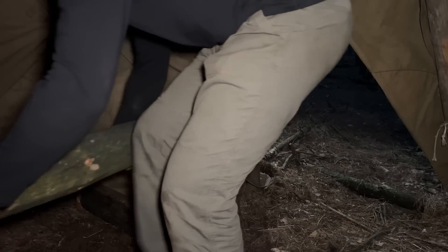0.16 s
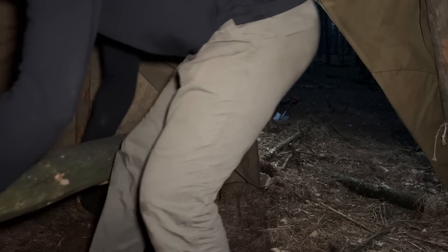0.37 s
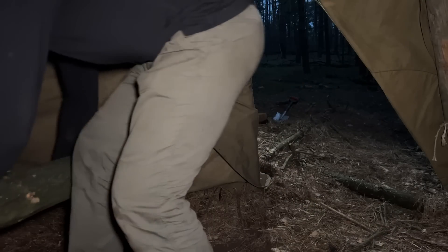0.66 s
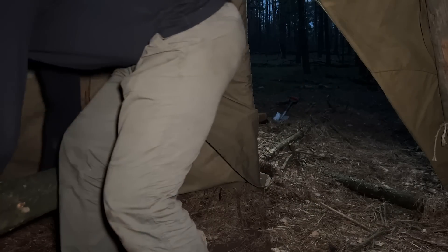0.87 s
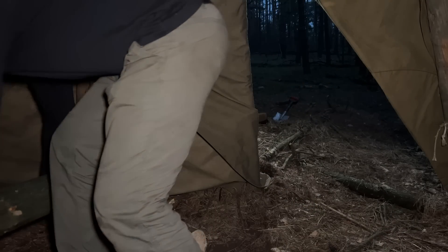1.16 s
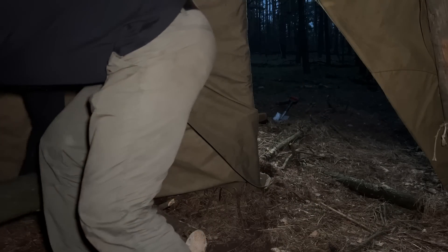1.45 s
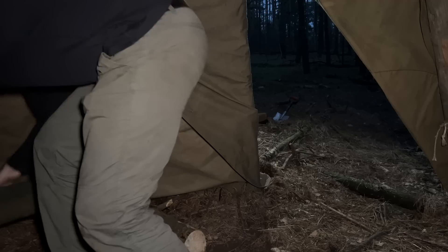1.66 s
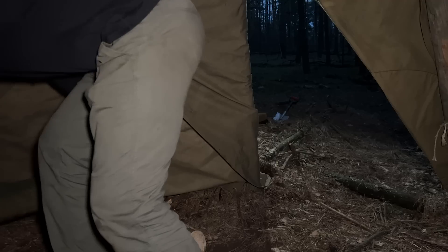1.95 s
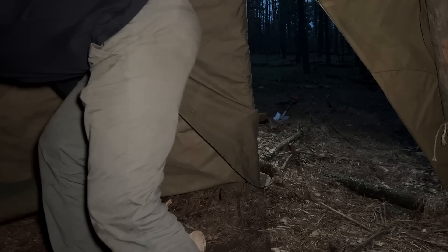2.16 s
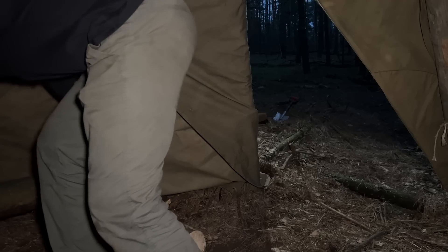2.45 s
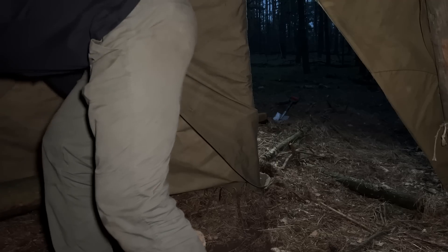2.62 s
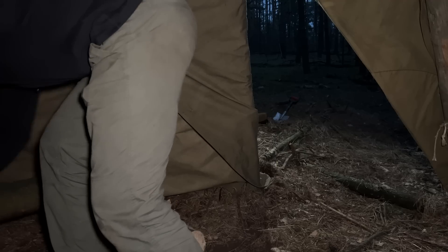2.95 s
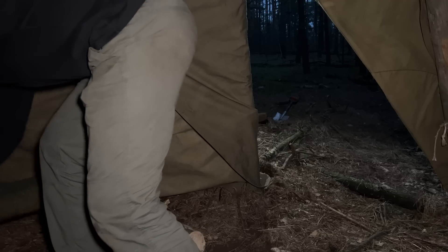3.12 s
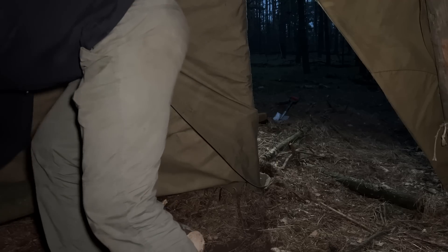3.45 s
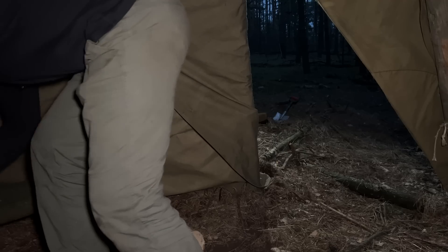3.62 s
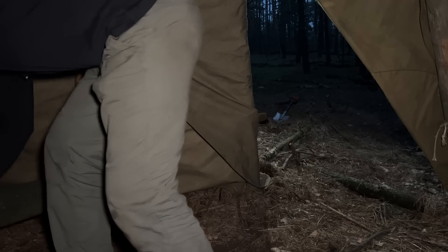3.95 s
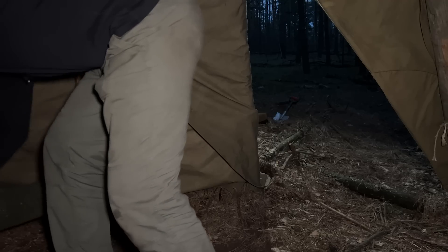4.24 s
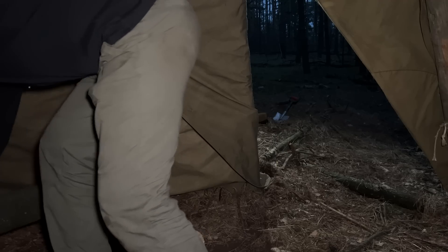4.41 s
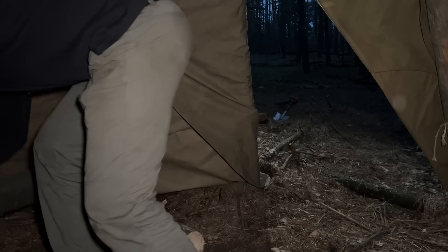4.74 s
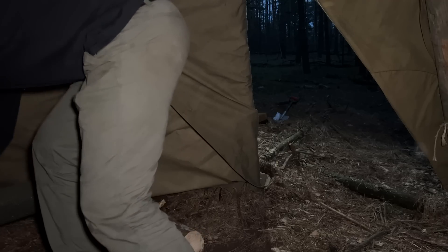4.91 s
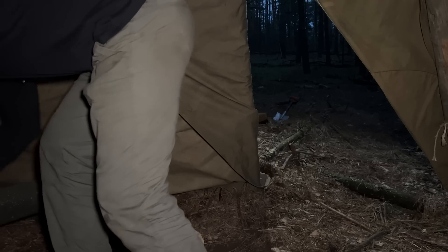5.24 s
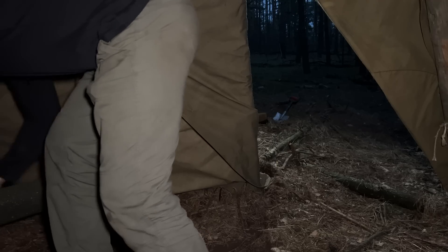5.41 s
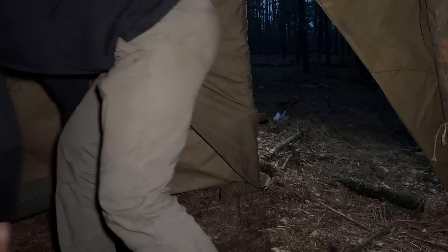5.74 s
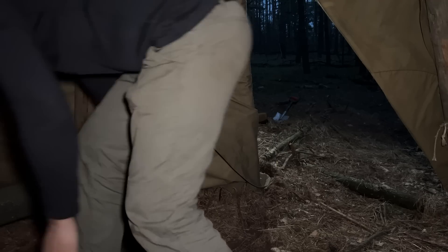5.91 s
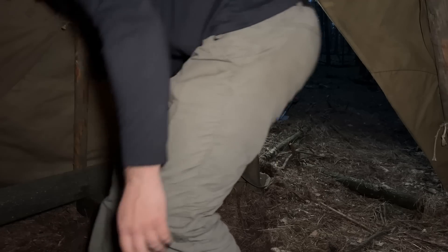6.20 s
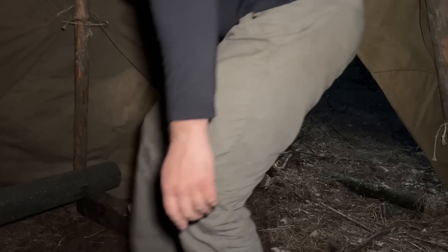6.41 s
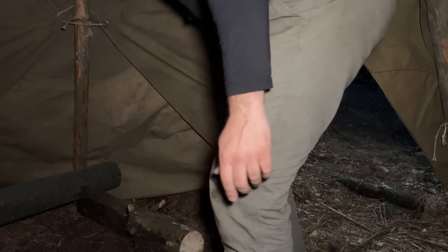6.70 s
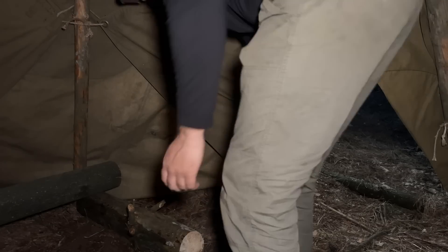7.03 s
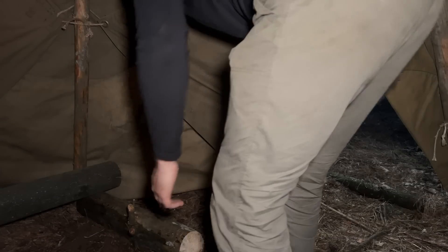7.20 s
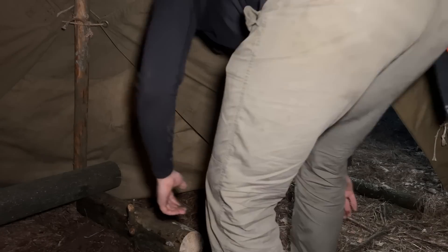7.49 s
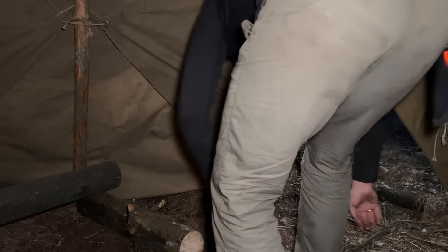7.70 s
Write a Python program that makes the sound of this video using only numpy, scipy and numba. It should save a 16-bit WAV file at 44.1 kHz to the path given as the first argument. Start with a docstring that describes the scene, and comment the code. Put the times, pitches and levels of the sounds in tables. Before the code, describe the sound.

Close, dry log dragging with rasps and twig snaps, three loud hollow thuds spaced apart, then faint scuffs and cloth swishes in forest hush.

```python
"""At first a log is dragged in shoves over dry needles: bark catches and slips, so random grains rasp and sing.
Near 1.7, 3.5 and 4.9 s it drops hard on its neighbours: damped log tones, ground thuds and crushed bark,
with the loudest peaks flattened; fainter knocks fall between. After that only small movements are left.
All along, noise makes scuffs, rustles and swishes, rounded pushes make soft thumps, short bursts snap and tick,
and low noise rumbles under a soft hush, swelling when weight rocks the stand. The tarp shelter gives no echo."""
import sys
import numpy as np
from scipy import signal
from scipy.fft import rfft, irfft, next_fast_len
from scipy.io import wavfile
from scipy.ndimage import uniform_filter1d
from numba import njit

SR = 44100
rng = np.random.default_rng(int(sys.argv[2]) if len(sys.argv) > 2 else 0)


def dump_mix(stems):
    """Bounce the given channels to the path in sys.argv[1] as a 16-bit WAV at rate SR."""
    frames = np.atleast_2d(stems).T  # one column per channel
    limited = np.clip(frames, -1, 1)  # hard clip at full scale
    pcm = np.round(limited * 32767).astype(np.int16)
    wavfile.write(sys.argv[1], SR, pcm)


N = 346609
TIME = np.arange(N) / SR
TOP_HZ = 15800  # upper edge of the sound

# Log on log, each blow and rebound: (time [s], ring gain [dB], log pitch [Hz], contact length [ms],
# time until it lands again [ms], change of the ring on landing [dB], thud gain [dB], bark crack gain [dB])
LOG_KNOCKS = [(1.725, -6.5, 409, .7, 24.8, -6, -9.5, -32.5), (2.2989, -29.5, 400, .8, 13, -6.5, -26, -48),
              (3.3385, -30, 418, .7, 14.6, -3.5, -24.5, -42.5),
              (3.3987, -25.5, 416, 1.3, 11.7, 3, -18.5, -39.5),
              (3.4563, 0.5, 408, 1.3, 15.36, -28, -11.5, -26),
              (3.4740, -16.5, 421.6, .6, 40, -5.5, -32.5, -44.5),
              (3.4720, -24.5, 699, 0.68, 16, -15, -37, -46.5), (4.8254, -29, 519, .7, 13, -6.5, -23, -37.5),
              (4.8338, -21.5, 427, .5, 18, -5.5, -28.5, -36),
              (4.9449, 5.5, 405, 1.6, 15.3, -31, -11, -22.5),
              (4.962, -26.5, 701, 0.79, 24, -21.5, -34.5, -51),
              (4.9673, -12, 426, 1.3, 14.2, -10, -23.5, -53)]
# Tones of a log: (multiple of its pitch [ratio], relative level [dB], time to fade by 60 dB [s])
LOG_MODES = [(1.01, 5, 0.21), (.98, -2.5, 0.11), (.7, -0.5, 0.021), (1.25, -20.5, .07), (1.47, -13.5, .09),
             (1.68, -7.5, 0.13), (1.78, -2, 0.019), (2.2, -21.5, 0.037), (2.64, -18.5, .05),
             (2.95, -24, .08)]
# Tones of the ground under the pile: (frequency before the thud's pitch factor [Hz], relative level [dB],
# time to fade by 60 dB [s])
GROUND_MODES = [(90, -17, 0.22), (147, -6.5, 0.053), (196, -1.5, 0.11), (290, 16.5, 0.0077)]
# Shoves of the log over the litter: (start [s], length [s], hollow drag before trim [dB],
# bark scrape before trim [dB], needle rustle before trim [dB], singing pitch around mid-shove [Hz])
LOG_SHOVES = [(0.038, 0.07, -43, -47, -54.5, 960), (0.114, 0.059, -46, -43.5, -53, 1200),
              (0.201, 0.044, -51.5, -50, -55, 1250), (0.333, 0.069, -49, -58, -59, 540),
              (0.453, 0.17, -44, -47.5, -52, 1000), (0.644, 0.038, -38.5, -37.5, -46.5, 1020),
              (0.669, 0.041, -37, -39, -46, 980), (0.736, 0.044, -37.5, -42.5, -51.5, 660),
              (.81, 0.085, -43, -44, -54, 800), (0.922, 0.12, -42, -45, -54.5, 1080),
              (1.195, 0.039, -44, -44, -50, 900), (1.325, 0.047, -45, -47, -64, 1100),
              (1.557, .025, -44.5, -51, -58, 700), (1.666, 0.091, -43, -43.5, -51, 900),
              (1.789, .08, -45.5, -51, -54.5, 900), (2.257, 0.016, -44, -48.5, -53, 620),
              (2.289, 0.066, -38.5, -46, -48, 1150), (3.27, .15, -48, -53, -56, 620),
              (4.721, 0.077, -47.5, -54, -58, 800), (4.781, 0.079, -38.5, -48, -55.5, 760),
              (4.89, 0.022, -45, -54, -51.5, 1200)]
# Shuffles of feet and body: (start [s], length [s], dull ground scuff before trim [dB],
# litter rasp before trim [dB], rustle of cloth and needles before trim [dB])
BODY_SHUFFLES = [(1.075, 0.86, -53.5, -58, -61.5), (1.971, 0.17, -55, -63.5, -63),
                 (2.389, 0.054, -52.5, -59.5, -64.5), (2.754, 0.28, -60.5, -64.5, -68.5),
                 (3.032, 0.073, -53.5, -55, -53.5), (3.133, 0.066, -59, -63.5, -61),
                 (3.53, 0.28, -56, -65.5, -70.5), (3.97, 0.57, -57.5, -62.5, -65.5),
                 (4.428, 0.076, -50, -57, -60.5), (4.54, 0.098, -56.5, -68, -73),
                 (4.999, 0.15, -59.5, -63.5, -71), (5.97, 0.31, -68, -72, -72.5),
                 (6.757, 0.26, -63.5, -67.5, -68.5), (7.341, .05, -67.5, -63.5, -73),
                 (7.442, 0.064, -63.5, -59.5, -65.5), (7.57, 0.074, -69, -68, -68.5),
                 (7.764, 0.1, -55.5, -58.5, -60)]
# Soft bumps of feet and wood on the ground: (peak time [s], peak before the high-pass [dB], half length [ms])
GROUND_THUMPS = [(0.583, -21.5, 11.7), (1.365, -23, 6.2), (1.568, -17.5, 11.5), (2.313, -24.5, 1.6),
                 (2.8944, -24, 0.87), (2.901, -32, 2.7), (2.962, -21, 4.5), (2.992, -20.5, 13),
                 (3.175, -32, 1.15), (3.411, -17, 1.6), (3.736, -32, 0.51), (4.688, -35.5, 1.05),
                 (4.844, -26, 0.52), (4.848, -25, 0.41), (4.858, -17.5, 1.1), (5.7547, -28, 1.1),
                 (5.979, -39, 0.65), (6.073, -25, 4.8), (6.482, -27.5, 7.3), (6.629, -32.5, 1.2),
                 (6.724, -32.5, 0.54), (7.578, -46, 0.64)]
# Twigs and bark snapping: (time [s], strength [dB], pitch [Hz], decay [ms])
TWIG_SNAPS = [(.06, -36.5, 880, 4), (0.459, -54, 1160, 2.2), (.532, -36, 990, 5.1),
              (0.625, -38.5, 2340, 20), (0.8213, -42, 5830, 6.4), (1.016, -44.5, 3020, 23),
              (1.289, -40, 910, 5.5), (1.559, -45, 4000, 5), (1.728, -36.5, 3200, 6),
              (1.754, -34, 6340, 2.7), (2.3, -33.5, 980, 8.1), (2.721, -48, 2680, 2.6),
              (2.7572, -52, 2420, 11), (3.393, -34, 5640, 1.4), (3.4572, -18.5, 5200, 0.74),
              (3.46, -33.5, 1980, 8.9), (3.7321, -41, 820, 9.1), (3.734, -41, 3680, 5.3),
              (4.2498, -52.5, 7140, 3.9), (4.687, -47.5, 720, 12), (4.823, -34, 1835, 6),
              (6.7205, -47.5, 800, 10), (7.25, -55.5, 905, 10), (7.2515, -61.5, 5000, 8),
              (7.336, -58, 1410, 2.8), (7.4353, -54.5, 2000, 2.5)]
# Sleeves and trouser legs brushing past: (peak time [s], peak level [dB], half length [s])
CLOTH_SWISHES = [(1.21, -54.5, 0.023), (3.028, -58, 0.07), (7.247, -77, 0.011), (7.476, -60.5, 0.064),
                 (7.628, -63, 0.067)]
# Weight coming down beside the stand and rocking it: (start [s], length [s], rumble before trim [dB])
STAND_ROCKS = [(1.733, 0.3, -37.5), (2.29, 0.12, -31.5), (2.94, 0.07, -33.5), (3.334, 0.18, -30),
               (4.797, 0.21, -29.5)]

# Colours of the noises, from dull to bright within each: (frequency [Hz], relative level [dB])
# the log's hollow body and the dull ground
DRAG_COLOUR = [(40, -13.5), (75, 2.5), (140, -3.5), (230, -5), (400, -5.5), (540, -4), (700, -8.5),
               (900, -20.5), (1400, -46)]
# bark and litter rasping
SCRAPE_COLOUR = [(500, -23), (780, -1.5), (1030, -3), (1300, -1.5), (1650, -6.5), (2100, -7), (2700, -18.5),
                 (4500, -33.5)]
# trouser cloth and needles
RUSTLE_COLOUR = [(1200, -26), (2400, 0.5), (3200, -1.5), (5000, -5), (7000, -6), (9500, -12),
                 (12500, -12.5), (15000, -19.5), (16000, -35)]
# crushed bark
CRACK_COLOUR = [(300, -4.5), (900, 6.5), (1600, -5), (2100, -4), (3000, -7.5), (6000, -18.5), (12000, -23),
                (16000, -43)]
# fabric on fabric
SLEEVE_COLOUR = [(1500, -24), (3500, -24), (5000, -3), (7000, 1), (9500, -4), (12500, -5), (16000, -14)]
# the shaking stand
STAND_COLOUR = [(5, -0.5), (11, 0), (18, -2), (26, -1), (36, -1.5), (55, -12), (90, -18.5), (140, -25.5),
                (250, -52.5)]
# the hush of the forest
AIR_COLOUR = [(20, 9.5), (40, 16.5), (80, 13), (130, 4), (250, -0.5), (500, -6), (1000, -10.5),
              (2000, -15.5), (4000, -20.5), (8000, -21.5), (14000, -26), (16000, -39)]

# Every movement builds up, holds and dies away; the bark sings higher as a shove goes on
ATTACK_S, RELEASE_S, RISE_OCT_PER_S = 0.029, .031, .6
# The litter is never quite at rest (level before trim)
REST_DB = -78
# Build-up and fading of a rock of the stand, and its shake in between (level before trim)
ROCK_ATTACK_S, ROCK_RELEASE_S, STILL_DB = 0.05, 0.068, -44.5


def knocks(land_ms=1.95, rebound_db=-8.0, crack_ms=7, crumble_db=-24, crumble_ms=40):
    """A log strikes the pile and rings until it lands again, which changes the ring and thuds once more."""
    out = np.zeros(N)
    t = np.arange(SR // 2) / SR
    ms = t * 1000
    for s, ring_db, pitch_hz, contact_ms, free_ms, choke_db, thud_db, crack_db in LOG_KNOCKS:
        # a longer contact is a softer push, with fewer high tones
        push = np.sin(np.pi * np.minimum(ms[:SR // 100] / contact_ms, 1))
        push /= push.sum()
        landed = (1 + np.tanh((ms - free_ms) / land_ms)) / 2  # goes from 0 to 1
        wood = ring(LOG_MODES, pitch_hz, t) * (1 - landed + landed * undb(choke_db))
        thud = undb(thud_db) * ring(GROUND_MODES, 0.89, t)
        add(out, s, np.convolve(undb(ring_db) * wood + thud, push))
        add(out, s + free_ms / 1000, undb(rebound_db) * np.convolve(thud, push))
        # bark is crushed at the contact and crumbles a little after it
        crush = np.exp(-ms / crack_ms) + undb(crumble_db) * np.exp(-ms / crumble_ms)
        bark = colour(rng.standard_normal(len(t)), CRACK_COLOUR)
        add(out, s, undb(crack_db) * crush * bark)
    return out


def ring(modes, pitch_hz, t):
    """Fading tones set off by one blow; neighbours swing oppositely, so the ring takes a moment to build."""
    total = np.zeros(len(t))
    for k, (ratio, db, t60) in enumerate(modes):
        fade = np.exp(-np.log(1000) * t / t60)
        total += (-1) ** k * undb(db) * np.sin(2 * np.pi * ratio * pitch_hz * t) * fade
    return total


def dragging(drag, scrape, contact_hz, drag_db=-2, scrape_db=-2, squeal_db=-2, squeal_q=13,
             grip=0.36, grip_db=-43, judder_db=0.33, wood_share=.6, wood_q=18):
    """Bark catches and slips over the litter; the slips sound the log's hollow and the contact sings."""
    catches = undb(1.8 * walk(24))
    judder = catches * undb(judder_db * walk(70))
    slips = grains(4000, 1.7) * judder
    wood = sum(resonate(slips, hz, wood_q) for hz in (400, 540, 690))
    hollow = colour(slips + wood_share * wood, DRAG_COLOUR) * drag * undb(drag_db)
    crumbs = grains(3000, 3.2)
    rasp = undb(scrape_db) * colour(crumbs * judder, SCRAPE_COLOUR)
    wandering_hz = contact_hz * np.exp(0.046 * walk(30))
    squeal = unit(glide(grains(6000, 2.5), wandering_hz, float(squeal_q)))
    # below grip_db a lightly brushed contact sings less and mostly rasps
    missing_grip_db = np.minimum(20 * np.log10(scrape) - grip_db, 0)
    sing = undb(squeal_db + grip * missing_grip_db)
    return hollow + (rasp + sing * squeal * judder) * scrape


def contact():
    """Pitch at which the bark sings: each shove has its own and hands over to the next."""
    pitch, weight = np.zeros(N), np.zeros(N)
    for s, length, *_, hz in LOG_SHOVES:
        speed = swell(s, length, ATTACK_S, RELEASE_S)
        from_middle = np.clip(TIME - s, 0, length) - length / 2
        pitch += speed * hz * np.exp2(RISE_OCT_PER_S * from_middle)
        weight += speed
    return pitch / weight


@njit
def glide(x, hz, q):
    """A resonance whose centre moves from sample to sample."""
    y, band, low = np.empty(len(x)), 0., 0.
    for i in range(len(x)):
        g = np.tan(np.pi * hz[i] / SR)
        v = (band + g * (x[i] - low)) / (1 + g * (g + 1 / q))
        band, low, y[i] = 2 * v - band, low + 2 * g * v, v / q
    return y


def handling():
    """Gains of the hollow drag, the scrape and the rustle, each set by its strongest movement."""
    gains = np.full((3, N), undb(REST_DB))
    movements = [shove[:5] for shove in LOG_SHOVES] + BODY_SHUFFLES
    for s, length, *db in movements:
        gains = np.maximum(gains, np.outer(undb(db), swell(s, length, ATTACK_S, RELEASE_S)))
    return gains


def swell(start, length, attack_s, release_s):
    """Gain of one movement: it builds up to 1 before its start, holds, then dies away."""
    before = np.maximum(start - TIME, 0)
    after = np.maximum(TIME - start - length, 0)
    return np.exp(-before / attack_s - after / release_s)


def thumps(leak_hz=28):
    """A heel or the end of a log presses the soft ground: one rounded push each, its slowest part removed."""
    out = np.zeros(N)
    ms = np.arange(-SR // 20, SR // 20) / SR * 1000
    for s, db, half_ms in GROUND_THUMPS:
        add(out, s - 1 / 20, undb(db) * np.exp(-(ms / half_ms) ** 2))
    return signal.sosfilt(signal.butter(1, leak_hz, "high", fs=SR, output="sos"), out)


def snaps(body_q=1.0, stick_q=9, stick_share=1.0, splinter=0.72, reach=2.76):
    """A twig breaks in a short run of uneven splinters that ring at its pitch; low ones have little treble."""
    out = np.zeros(N)
    ms = np.arange(SR // 10) / SR * 1000
    for s, db, hz, decay_ms in TWIG_SNAPS:
        noise, size = rng.standard_normal((2, len(ms)))
        fade = np.exp(-ms / decay_ms)
        burst = noise * np.exp(splinter * size) * fade
        twig = resonate(burst, hz, body_q) + stick_share * resonate(burst, hz, stick_q)
        twig = signal.lfilter(*signal.butter(2, min(reach * hz, TOP_HZ), fs=SR), twig)
        # a longer fade carries more energy
        add(out, s, undb(db) * unit(twig) * np.sqrt(np.mean(fade ** 2)))
    return out


def rustling(rustle, rustle_db=-1, crackle_db=-3, flutter_db=1.44):
    """Trouser cloth swishes as smooth noise while dry needles crackle in it as grains."""
    cloth = rng.standard_normal(N) * undb(flutter_db * walk(70))
    needles = undb(crackle_db) * grains(2200, 4.6) * undb(2.0 * walk(35))
    return colour(cloth + needles, RUSTLE_COLOUR) * rustle * undb(rustle_db)


def swishes():
    """Smooth fabric sliding on fabric: a soft, high hiss that swells and fades."""
    speed = sum(undb(db) * np.exp(-((TIME - s) / half_s) ** 2) for s, db, half_s in CLOTH_SWISHES)
    fluttering = rng.standard_normal(N) * undb(1.1 * walk(90))
    return speed * colour(fluttering, SLEEVE_COLOUR)


def ticks(count=9, tick_db=-57, tick_hz=3500, spread_oct=.55, decay_s=.002, tick_q=2.5):
    """At random times a trodden needle springs back with a faint tick: a short ringing burst of noise."""
    out = np.zeros(N)
    t = np.arange(SR // 50) / SR
    for when, size in rng.random((count, 2)):
        hz = tick_hz * 2 ** (spread_oct * (1 - 2 * size))  # bigger needles tick lower
        tick = unit(resonate(rng.standard_normal(len(t)), hz, tick_q))
        add(out, when * N / SR, undb(tick_db) * tick * np.exp(-t / decay_s))
    return out


def background(rumble_db=-2, air_db=-56):
    """The stand shakes slowly with the ground as low noise, over the even rumble and hush of the forest."""
    shake = undb(STILL_DB)
    for s, length, db in STAND_ROCKS:
        shake = np.maximum(shake, undb(db) * swell(s, length, ROCK_ATTACK_S, ROCK_RELEASE_S))
    rumble = colour(rng.standard_normal(N), STAND_COLOUR) * shake * undb(rumble_db)
    return rumble + undb(air_db) * colour(rng.standard_normal(N), AIR_COLOUR)


def undb(db):
    """Decibels to gain."""
    return 10 ** (np.asarray(db) / 20)


def unit(x):
    """Scale to an average strength (rms) of 1."""
    return x / np.sqrt(np.mean(x ** 2))


def add(out, s, x):
    """Mix x into out from time s."""
    i = max(int(s * SR), 0)
    out[i:i + len(x)] += x[:max(N - i, 0)]


def colour(x, points):
    """Filter x by a curve of (frequency [Hz], level [dB]) points; rms 1."""
    hz, db = np.transpose(points)
    size = next_fast_len(len(x))
    f = np.maximum(np.arange(size // 2 + 1) * SR / size, 1)
    gain = undb(np.interp(np.log(f), np.log(hz), db, left=-90, right=-90))
    return unit(irfft(rfft(x, size) * gain, size)[:len(x)])


def resonate(x, hz, q):
    """One resonance, gain 1 at its centre; a higher q rings longer."""
    hz = min(hz, SR / 3)
    return signal.lfilter(*signal.iirpeak(hz, max(q, 3 * hz / SR), fs=SR), x)


def walk(rate):
    """Smooth random wandering with about rate new targets a second; rms 1."""
    k = max(int(SR / rate), 2)
    steps = np.repeat(rng.standard_normal(N // k + 1), k)
    return unit(uniform_filter1d(steps, k)[:N])


def grains(per_s, spread_db):
    """Random tiny fractures: many faint ones, a few strong; rms 1."""
    hit = rng.random(N) < per_s / SR
    size = undb(spread_db * np.minimum(rng.exponential(size=N), 5))
    return unit(hit * size * rng.choice([-1, 1], N))


def scene():
    """Everything is close and dry: canvas and forest floor return no echo."""
    drag, scrape, rustle = handling()
    log = knocks() + dragging(drag, scrape, contact())
    feet_and_twigs = thumps() + snaps() + ticks()
    cloth = rustling(rustle) + swishes()
    return (log + feet_and_twigs + cloth + background())[None]


def record(dry):
    """The hardest knocks overload the microphone and flatten against its ceiling; the top is cut."""
    ceiling, knee = .7, 10  # a higher knee flattens more abruptly
    flattened = dry / (1 + np.abs(dry / ceiling) ** knee) ** (1 / knee)
    return signal.sosfilt(signal.ellip(8, .2, 80, TOP_HZ, fs=SR, output="sos"), flattened)


dry = scene()
out = record(dry)
dump_mix(out)
```